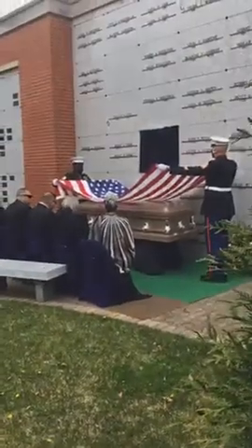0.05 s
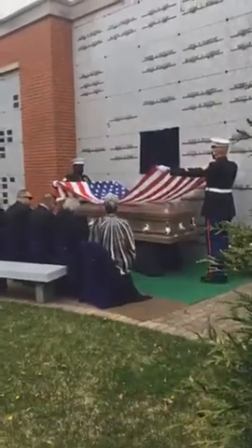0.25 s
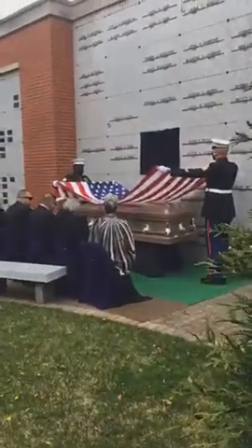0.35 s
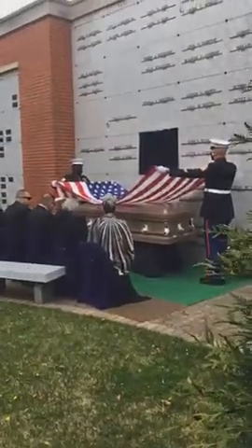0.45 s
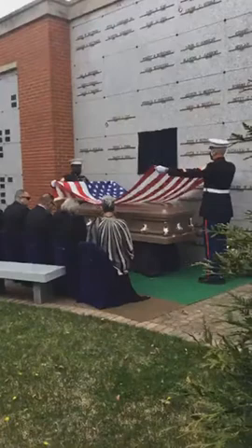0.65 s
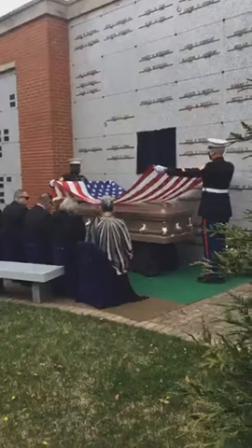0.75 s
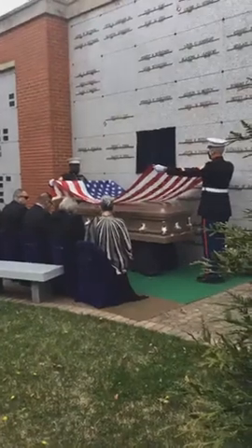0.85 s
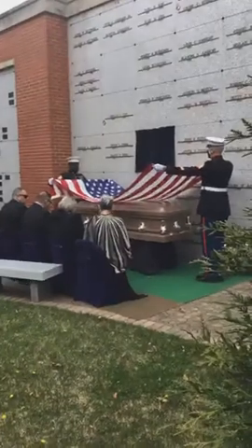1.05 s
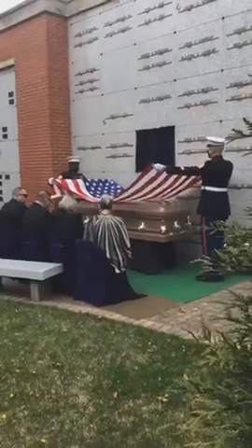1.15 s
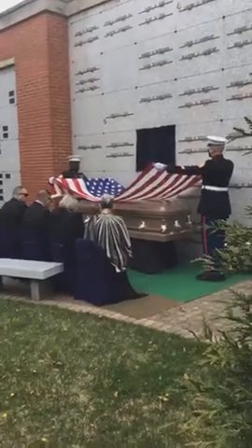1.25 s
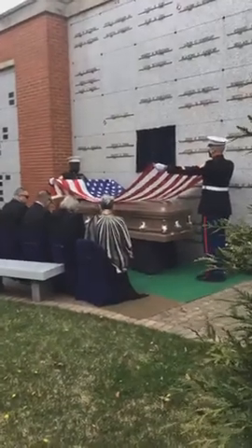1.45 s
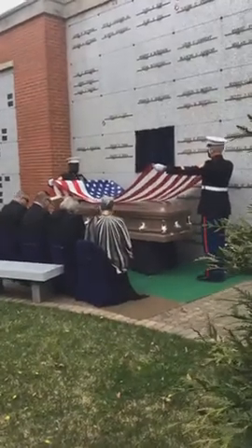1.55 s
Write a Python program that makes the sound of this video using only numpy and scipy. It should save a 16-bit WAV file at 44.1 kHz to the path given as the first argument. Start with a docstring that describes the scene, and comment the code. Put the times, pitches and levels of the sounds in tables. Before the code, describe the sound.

A very loud, ragged rifle volley cracks outdoors and rolls away in a long echo.

```python
"""Rifle volley in a cemetery

An honour guard beside a stone wall fires one ragged volley: eight reports within 60 ms that overlap
in a hollow ring and overload the microphone. The near walls clatter; far buildings and trees roll the
sound back. Low outdoor air lies underneath. Close by, two ticks, a soft bump and a hiss come before
the shots; faint rustles and two high chirps sound through the dying roll."""
import sys
import numpy as np
from scipy import signal
from scipy.fft import rfft, irfft
from scipy.io import wavfile
from scipy.ndimage import uniform_filter1d

SR = 44100
rng = np.random.default_rng(int(sys.argv[2]) if len(sys.argv) > 2 else 0)


def transcribe(u):
    """Save the signal u as a 16-bit wav file named by the first command-line argument.

    u: samples, shape (n,) or (channels, n), limited to [-1, 1]; the rate is SR.
    q: integer samples, one column per channel.
    """
    v = np.clip(np.atleast_2d(u).T, -1, 1)
    q = np.round(v * 32767).astype(np.int16)
    wavfile.write(sys.argv[1], SR, q)


N = 70560  # 1.6 s

# rifle reports of the volley: t/s, level/dB, blast length/s, crack/dB, thump/dB
REPORTS = [(0.2396, 1, 0.00053, -1, 7.5), (0.2538, -1, 0.00075, -1.5, -1.5), (.2590, 1, 0.00043, -0.5, -6),
           (.2650, -1, 0.0011, -3, -3), (0.2811, -4.5, 0.00035, -3, -9.5), (0.2886, -4, 0.00074, 0.5, -8.5),
           (0.2942, 1, 0.00047, -1.5, -8.5), (0.2994, 1, 0.00055, -2.5, -1.5)]
# dry, bright spectrum of the ticks and rustles near the microphone: f/Hz, level/dB
DRY_SPECTRUM = [(500, -20), (3000, 1), (6000, -4), (9000, 2), (12000, -17), (16000, -13)]


def amp(db):
    """Decibels to gain."""
    return 10 ** (np.asarray(db) / 20)


def unit_rms(x):
    """Scales to rms 1."""
    return x / np.sqrt(np.mean(x ** 2) + 1e-20)


def curve_at(points, hz):
    """Interpolates a table on a log-frequency axis."""
    f, value = np.transpose(points)
    return np.interp(np.log(hz + 1), np.log(f + 1), value)


def add(mix, start, sound):
    """Mixes a sound in at a start time in seconds."""
    part = mix[max(round(start * SR), 0):][:len(sound)]
    part += sound[:len(part)]


def noise(spectrum):
    """Noise of rms 1, shaped by a spectrum of relative levels."""
    gain = amp(curve_at(spectrum, np.fft.rfftfreq(N, 1 / SR)))
    return unit_rms(irfft(rfft(rng.standard_normal(N)) * gain, N))


def burst(rise_s, decay_s):
    """Envelope with a quick rise and an exponential fall."""
    t = np.arange(N) / SR
    return (1 - np.exp(-t / rise_s)) * np.exp(-t / decay_s)


def outdoor_air():
    """The steady, low background of the open grounds."""
    # outdoor background: f/Hz, level/dB
    air_spectrum = [(20, -26), (40, -14), (65, -1), (120, 0), (250, -4), (350, -5), (480, -13), (650, -6),
                    (1200, -15), (2100, -21), (3000, -30), (4500, -32), (6500, -43), (16000, -52)]
    return amp(-52) * noise(air_spectrum)


def ticks():
    """Two tiny dry ticks near the microphone, in the hush before the volley."""
    # ticks: t/s, level/dB
    tick_events = [(.0575, -63), (.0975, -60)]
    fall = np.exp(-np.arange(N) / SR / 0.0013)
    out = np.zeros(N)
    for start, db in tick_events:
        add(out, start, amp(db) * noise(DRY_SPECTRUM) * fall)
    return out


def bump(peak_s=0.0738, width_s=0.0026, hz=215):
    """One soft, low knock: about a cycle of a tone under a bell-shaped envelope."""
    t = np.arange(N) / SR - peak_s
    return amp(-35) * np.sin(2 * np.pi * hz * t) * np.exp(-(t / width_s) ** 2)


def hiss(start_s=0.11, length_s=0.22):
    """A thin hiss swells just before the volley."""
    # hiss, strongest near 5 kHz: f/Hz, level/dB
    hiss_spectrum = [(1000, -32), (3000, -15), (4300, -7), (4900, -1.5), (5400, -5), (6100, -16.5),
                     (9000, -18), (16000, -27)]
    t, out = np.arange(0, length_s, 1 / SR), np.zeros(N)
    swell = np.sin(np.pi * t / length_s)
    add(out, start_s, amp(-58) * noise(hiss_spectrum)[:len(t)] * swell)
    return out


def reflections(spectrum, t60, rise_s):
    """A dense, slightly uneven train of reflections; each band dies at its own speed."""
    t = np.arange(N) / SR
    scatter_db = 0.5 * np.interp(t / 0.008, np.arange(N), rng.standard_normal(N))  # new value every 8 ms
    hz, age, bands = signal.stft(unit_rms(noise(spectrum) * amp(scatter_db)), SR, nperseg=512)
    decay = np.exp(-np.log(1000) * age / curve_at(t60, hz)[:, None])
    tail = signal.istft(bands * decay, SR, nperseg=512)[1][:N]
    return tail * (1 - np.exp(-t / rise_s))


def rifles(crack_decay_s=0.0073, thump_hz=177):
    """Each report: a pressure jump with its suction, a crack, a thump, then the walls and long roll."""
    # crack of a rifle: f/Hz, level/dB
    crack_spectrum = [(100, -11.5), (600, 8), (1500, -3), (4500, -2.5), (7000, -13), (10000, -17),
                      (16000, -24.5)]
    # clatter between the near walls: f/Hz, level/dB
    wall_spectrum = [(25, -32), (50, -20), (80, 2.5), (170, -0.5), (270, 1), (420, -4.5), (630, -2),
                     (1200, -5), (2100, -13.5), (4500, -18), (7000, -25), (11000, -33.5), (16000, -33.5)]
    # decay of the clatter: f/Hz, t60/s
    wall_t60 = [(60, 0.25), (250, 0.61), (1000, 0.53), (4000, 0.43), (9000, .42), (16000, 0.11)]
    # roll from across the grounds: f/Hz, level/dB
    roll_spectrum = [(30, -33), (70, -11), (160, -1), (270, -7.5), (420, -5), (680, 2), (1200, -4),
                     (2100, -12.5), (3000, -12.5), (5000, -17.5), (8000, -25.5), (11000, -33.5),
                     (16000, -38)]
    # decay of the roll: f/Hz, t60/s
    roll_t60 = [(60, 2.14), (200, 2.01), (700, 1.74), (1500, 2.114), (3000, 1.64), (5000, 1.18),
                (8000, 0.81), (14000, 0.48)]
    t, out = np.arange(N) / SR, np.zeros(N)
    for start, db, blast_s, crack_db, thump_db in REPORTS:
        blast = amp(-6) * (1 - t / blast_s) * np.exp(-t / blast_s)
        crack = amp(crack_db - 9) * noise(crack_spectrum) * np.exp(-t / crack_decay_s)
        thump = amp(thump_db - 8.5) * np.sin(2 * np.pi * thump_hz * t) * burst(0.0026, 0.01)
        clatter = amp(-13.5) * reflections(wall_spectrum, wall_t60, rise_s=0.012)
        roll = amp(-24.5) * reflections(roll_spectrum, roll_t60, rise_s=0.11)
        add(out, start, amp(db) * (blast + crack + thump + clatter + roll))
    return out


def volley_ring():
    """The overlapping reports give the volley a brief, hollow ring."""
    # tones of the ring: f/Hz, level/dB relative to the report, t60/s
    ring_tones = [(76.5, -27.5, 0.28), (166.7, -26.5, 0.7), (266.6, -18, 0.37), (371, -23.5, 0.32),
                  (600.3, -19.5, .25), (648, -24, .4), (935, -28, .3)]
    t, out = np.arange(N) / SR, np.zeros(N)
    for start, db, *_ in REPORTS:
        for hz, tone_db, t60 in ring_tones:
            tone = np.sin(2 * np.pi * (hz * t + rng.random()))
            envelope = burst(rise_s=0.013, decay_s=t60 / np.log(1000))
            add(out, start, amp(db + tone_db) * tone * envelope)
    return out


def rumble(rise_s=0.44):
    """The deepest part of the volley builds from the first report and lingers in the distance."""
    # distant rumble: f/Hz, level/dB
    rumble_spectrum = [(20, -25), (45, -16), (65, 2.5), (115, -3.5), (170, -10), (400, -31.5), (2000, -68)]
    swell = 1 - np.exp(-np.arange(N) / SR / rise_s)
    out = np.zeros(N)
    add(out, REPORTS[0][0], amp(-50.5) * noise(rumble_spectrum) * swell)
    return out


def building_echoes():
    """Far buildings return the volley as dull, smeared slaps."""
    # arrivals at the microphone: t/s, level/dB, decay/s
    arrivals = [(.312, -6, .018), (.403, -21, 0.018), (.468, -20, 0.012), (.501, -27, 0.01),
                (.548, -22.5, 0.052), (.682, -31, 0.039), (.784, -29.5, 0.012), (1.10, -45, 0.045),
                (1.321, -43, 0.045)]
    # dull colour of each slap: f/Hz, level/dB
    slap_spectrum = [(40, -32.5), (130, -7.5), (260, 7), (420, -7), (680, 1), (1200, -16.5), (2200, -19),
                     (4500, -31.5), (10000, -65.5)]
    out = np.zeros(N)
    for start, db, decay_s in arrivals:
        add(out, start, amp(db) * noise(slap_spectrum) * burst(0.17 * decay_s, decay_s))
    return out


def rustles():
    """Soft, dry swishes close to the microphone, perhaps of cloth."""
    # swishes: t/s, length/s, level/dB
    swishes = [(.87, 0.18, -72.5), (1.21, .12, -75), (1.483, .07, -76)]
    out = np.zeros(N)
    for start, length, db in swishes:
        t = np.arange(0, length, 1 / SR)
        envelope = np.sin(np.pi * np.sqrt(t / length))  # peaks a quarter of the way in
        add(out, start, amp(db) * noise(DRY_SPECTRUM)[:len(t)] * envelope)
    return out


def chirps(centre_hz=8560, waver_hz=121):
    """Two thin, wavering high chirps, perhaps a small bird."""
    # chirps: t/s, length/s, level/dB
    calls = [(1.065, .06, -76), (1.216, 0.041, -68.5)]
    out = np.zeros(N)
    for start, length, db in calls:
        t = np.arange(0, length, 1 / SR)
        waver = unit_rms(uniform_filter1d(rng.standard_normal(N), size=60))[:len(t)]
        phase = 2 * np.pi * np.cumsum(centre_hz + waver_hz * waver) / SR
        envelope = np.sin(np.pi * np.sqrt(t / length))
        add(out, start, amp(db) * envelope * np.sin(phase))
    return out


def scene():
    """The volley, its echoes and the small sounds around it, as they reach one microphone."""
    volley = rifles() + volley_ring() + building_echoes() + rumble()
    return (volley + bump() + ticks() + chirps() + rustles() + hiss() + outdoor_air())[None]


def record(dry):
    """The microphone overloads softly, flattening the volley; the treble ends at 15.9 kHz."""
    ceiling = amp(-3)
    clipped = ceiling * np.tanh(dry / ceiling)
    lowpass = signal.firwin(511, 15900, window=("kaiser", 9), fs=SR)
    return signal.oaconvolve(clipped, lowpass[None], "same")


dry = scene()
out = record(dry)
transcribe(out)
```